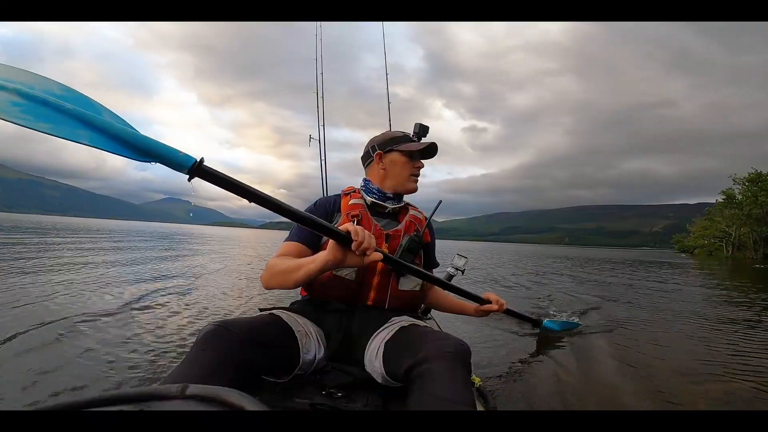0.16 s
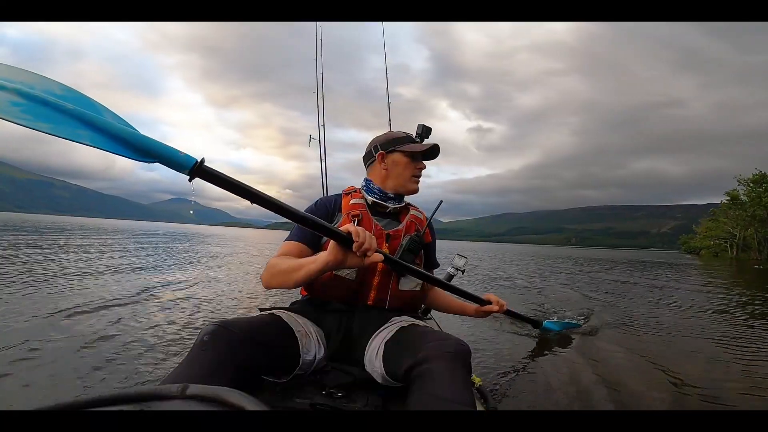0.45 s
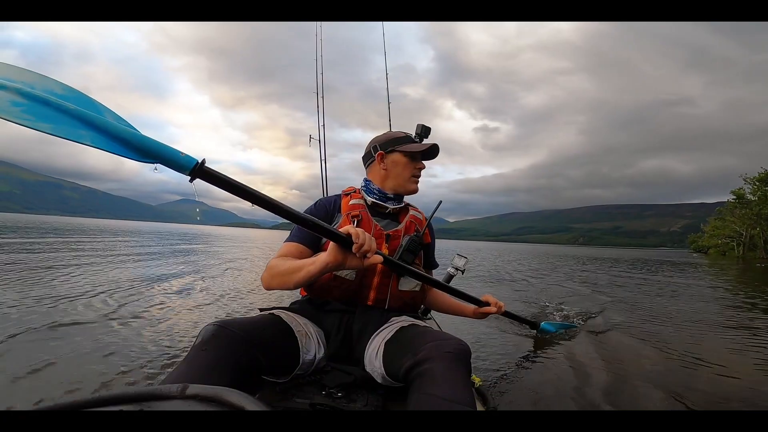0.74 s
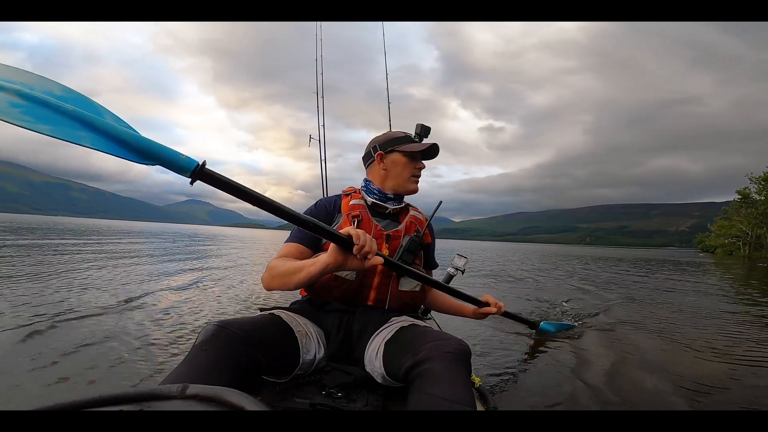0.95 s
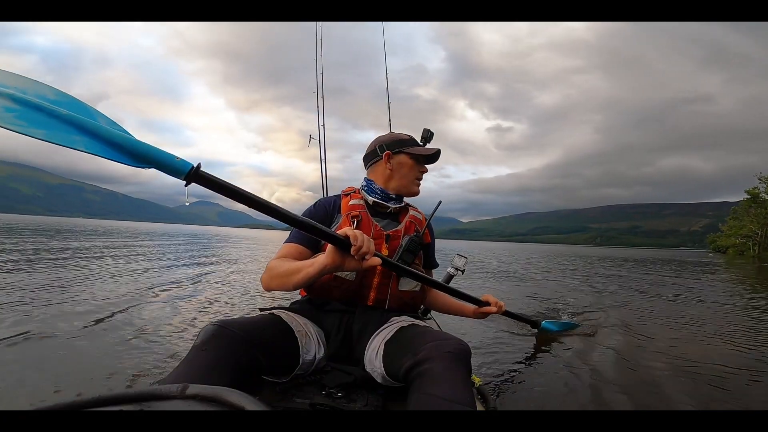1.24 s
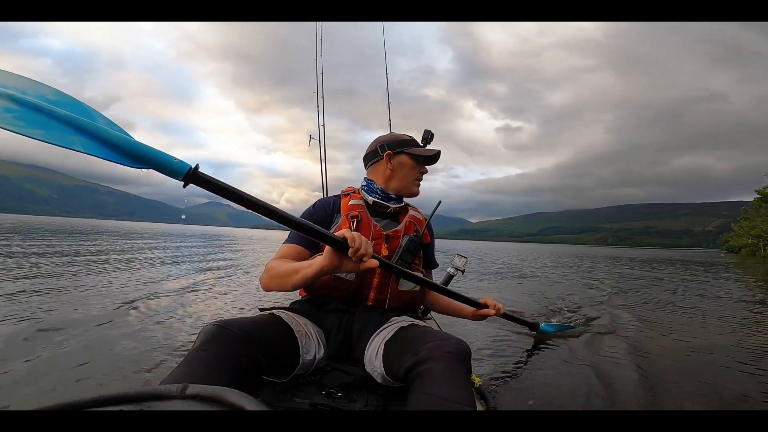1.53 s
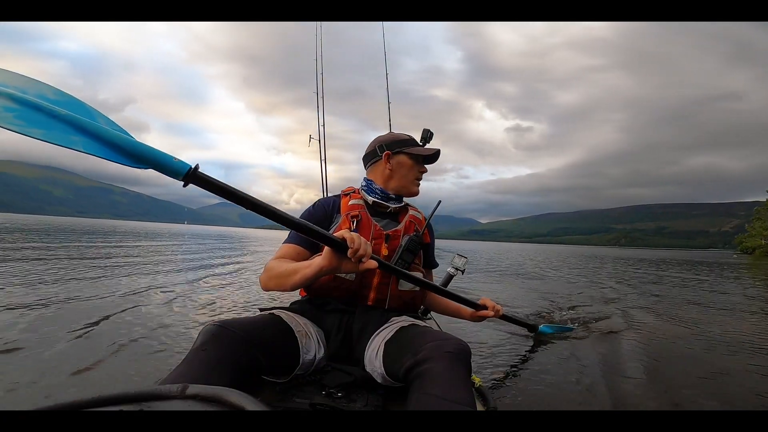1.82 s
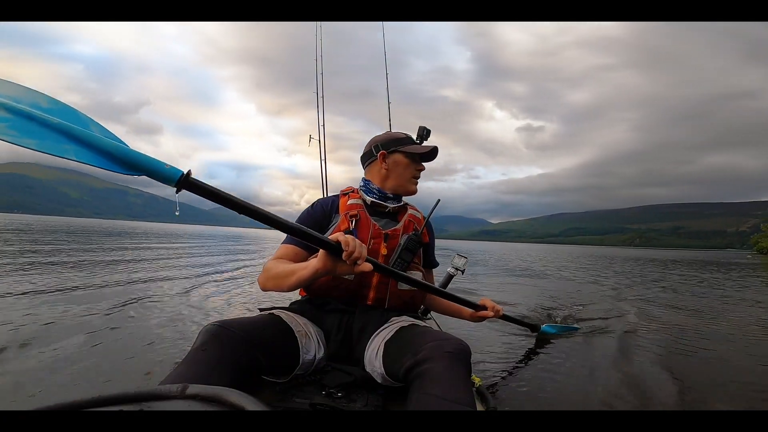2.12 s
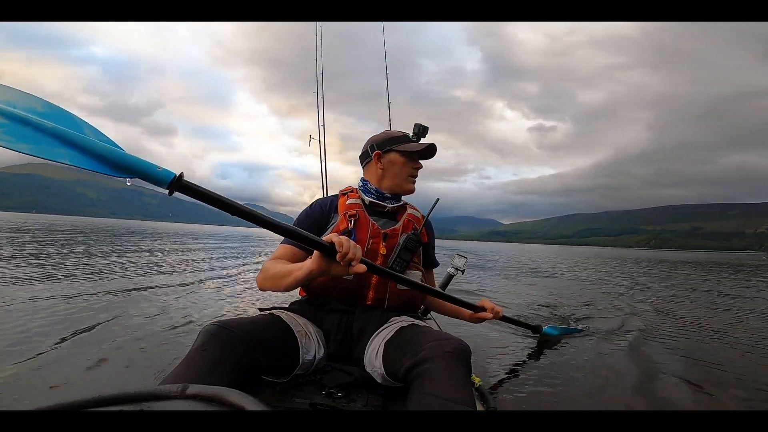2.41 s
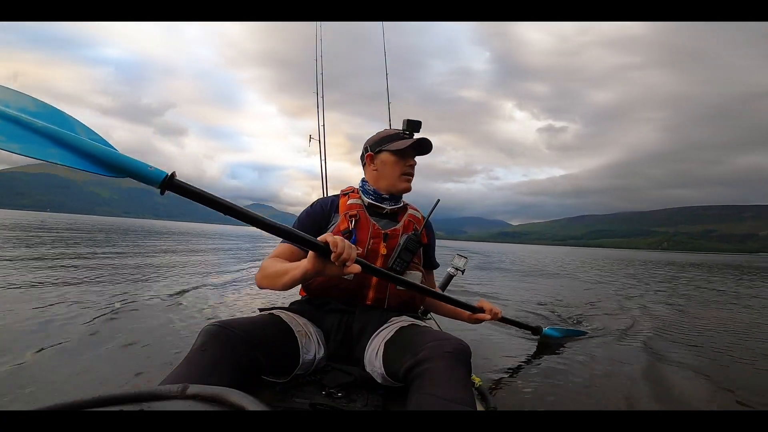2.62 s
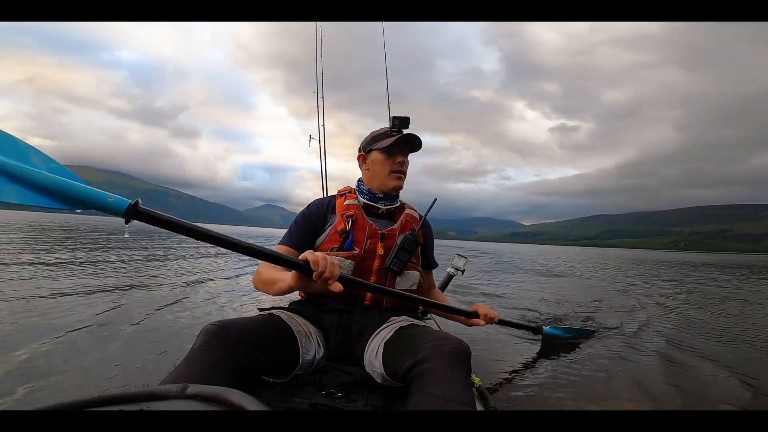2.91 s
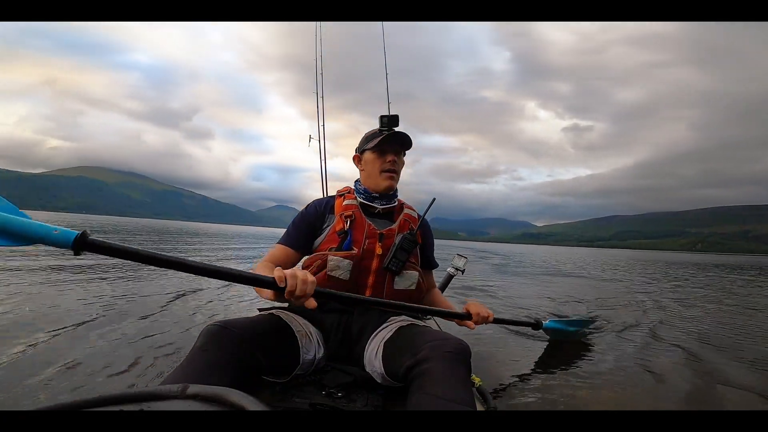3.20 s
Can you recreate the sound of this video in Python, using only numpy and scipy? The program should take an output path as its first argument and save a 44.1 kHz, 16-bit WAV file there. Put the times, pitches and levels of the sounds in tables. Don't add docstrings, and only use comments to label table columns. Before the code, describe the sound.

Water gurgles and drips around a dragging kayak paddle while light wind rumbles on the microphone

```python
import sys
import numpy as np
from scipy import signal
from scipy.io import wavfile

SR = 44100
rng = np.random.default_rng(int(sys.argv[2]) if len(sys.argv) > 2 else 0)


def bounce(signal):
    frames = np.transpose(np.atleast_2d(signal))
    limited = np.clip(frames, -1, 1)
    pcm = np.round(limited * 32767).astype(np.int16)
    wavfile.write(sys.argv[1], SR, pcm)


def volts_from_decibels(level):
    exponent = np.asarray(level, float) / 20
    return 10 ** exponent


N = 147735

# (time [s], level [dB])
CHURN_DB = [(0, -53.5), (.09, -55), (.2, -53.5), (.36, -52), (.56, -59.5), (.71, -50.5), (.93, -54.5),
            (1.03, -56), (1.14, -56.5), (1.3, -57), (1.47, -61.5), (1.57, -54), (1.75, -54), (1.98, -59.5),
            (2.38, -68.5), (2.62, -65.5), (2.74, -77), (3.35, -69)]
# (frequency [Hz], density [dB per Hz])
WASH_COLOUR = [(350, 7), (1000, -0.5), (1400, -0.5), (2500, -15.5), (4300, -16), (6300, -34.5),
               (10500, -62), (13000, -56)]
HALF_OCTAVES_HZ = 300 * 2 ** np.arange(0, 5.6, .5)


def rms_one(x):
    return x / np.sqrt(np.mean(x ** 2) + 1e-20)


def in_time(rows):
    return np.interp(np.arange(N) / SR, *np.transpose(rows))


def at_hz(points, hz):
    table_hz, table_db = np.transpose(points)
    return np.interp(np.log(hz), np.log(table_hz), table_db)


def drift(rate_hz):
    hop = 40
    pole = np.exp(-2 * np.pi * rate_hz * hop / SR)
    white = rng.standard_normal(N // hop + 2002)
    slow = signal.lfilter([1], [1, -2 * pole, pole * pole], white)[2000:]
    return np.interp(np.arange(N) / hop, np.arange(len(slow)), rms_one(slow))


def banded_noise(colour, edges_hz, shared_db, own_db, rate_hz):
    out, together = 0, drift(rate_hz)
    white = rng.standard_normal((2, N + SR))
    for k, (low_hz, high_hz) in enumerate(zip(edges_hz, edges_hz[1:])):
        sos = signal.butter(2, [low_hz, high_hz], "band", fs=SR, output="sos")
        band = signal.sosfilt(sos, white[k % 2])[SR:]
        level_db = at_hz(colour, np.sqrt(low_hz * high_hz))
        out = out + band * volts_from_decibels(level_db + shared_db * together + own_db * drift(rate_hz))
    return rms_one(out)


def ring(start_s, peak_db, pitch_hz, ring_cycles, rise_per_cycle):
    out = np.zeros(N + SR)
    ring_cycles = np.clip(ring_cycles, 3, 90)
    rows = np.broadcast_arrays(start_s, peak_db, pitch_hz, ring_cycles, rise_per_cycle)
    for s, db, hz, cycles, rise in zip(*rows):
        turn = np.arange(int(cycles / hz * SR)) * hz / SR
        attack_cycles = 1.41 * np.sqrt(hz / 1000)
        swell = 1 - np.exp(-(turn / attack_cycles) ** 2)
        tone = np.sin(2 * np.pi * (turn + rise * turn ** 2 / 2))
        i = int(s * SR)
        out[i:i + len(turn)] += swell * volts_from_decibels(db - 60 * turn / cycles) * tone
    return out[:N]


def cluster(start_s, peak_db, pitch_hz, cycles, rise, spread_s, side_db):
    out = ring(start_s, peak_db, pitch_hz, cycles, rise)
    draw = rng.random((len(start_s), 3, 3))
    for late, weak, tune in draw.transpose(1, 2, 0):
        side_hz = pitch_hz * 2 ** (1.1 * (tune - .3))
        side_peak_db = peak_db + side_db - 13.0 * weak
        out += ring(start_s + spread_s * late, side_peak_db, side_hz, 0.31 * cycles, rise)
    return out


def puffs(start_s, peak_db, t60_s):
    kicks = np.zeros(N)
    kicks[(start_s * SR).astype(int)] = volts_from_decibels(peak_db)
    return signal.lfilter([1], [1, -volts_from_decibels(-60 / (t60_s * SR))], kicks + 1e-18)


def spray(start_s, peak_db):
    edges_hz = 600 * 2 ** np.arange(0, 4.6, .5)
    return puffs(start_s, peak_db, 0.15) * banded_noise(WASH_COLOUR, edges_hz, 1.0, 1.5, 37.0)


def gulps():
    # (time [s], peak [dB], pitch [Hz], ring [cycles])
    pockets = [(0.032, -30, 1210, 16), (0.237, -24, 1034, 31), (0.255, -32.5, 950, 55),
               (0.269, -22.5, 1780, 16.7), (0.293, -24.5, 910, 16), (0.327, -27.5, 1360, 17),
               (0.381, -37.5, 1040, 37), (0.418, -35.5, 1820, 33), (0.705, -22, 1300, 14),
               (0.806, -34.5, 903, 42), (0.932, -36, 975, 110), (1.197, -40, 1140, 25),
               (1.229, -31, 1040, 45), (1.365, -38.5, 860, 100), (1.57, -30.5, 1430, 26),
               (1.628, -28.5, 1520, 21), (1.659, -38.5, 920, 36), (1.827, -20, 1100, 9.3),
               (1.912, -21, 1210, 23), (1.919, -23.5, 1350, 35), (2.295, -44.5, 1016, 71),
               (2.335, -43, 1096, 96), (2.376, -45.5, 992, 76), (2.606, -38, 970, 26),
               (2.608, -39, 1400, 41), (2.98, -40.5, 875, 25), (2.994, -40, 1220, 39)]
    last_pocket = (3.052, -35.5, 1191, 17)
    s, db, hz, cycles = np.transpose(pockets + [last_pocket])
    body = cluster(s, db + 0.5, hz * 0.977, cycles, 0.0053, spread_s=0.0051, side_db=3.0)
    smack = ring(s, db - 8.5, hz * 1.35, 0.54 * cycles, 0)
    dull_spray = signal.lfilter(*signal.butter(2, 2400, fs=SR), spray(s, db - 24))
    return body + smack + dull_spray


def slow_gulp():
    start_s, peak_db, pitch_hz, cycles = 1.968, -42.5, 563, 22.2
    turn = np.clip((np.arange(N) / SR - start_s) * pitch_hz, 0, cycles)
    swell = np.sin(np.pi * turn / cycles) ** 2
    return volts_from_decibels(peak_db) * swell * np.sin(2 * np.pi * (turn + 0.019 * turn ** 2))


def bubbles_and_drops():
    # (time [s], peak [dB], pitch [Hz])
    small_bubbles = [(0.03, -43, 2600), (0.1585, -36, 2200), (0.347, -39.5, 2740), (0.386, -37, 2580),
                     (0.4137, -42, 2900), (0.4852, -38, 2650), (0.5387, -48, 2700), (0.7178, -29, 2560),
                     (0.7782, -28.5, 3590), (0.8436, -34.5, 3460), (0.921, -29.5, 2310),
                     (1.1335, -35, 2240), (1.27, -39, 2340), (1.3005, -37.5, 2350), (1.3275, -41, 3650),
                     (1.5536, -36.5, 2530), (1.732, -32.5, 2160), (1.811, -41.5, 3040),
                     (2.0444, -37.5, 3010), (2.2178, -39, 3850), (2.2544, -44, 2400), (2.377, -34, 2400),
                     (2.4616, -46, 2270), (2.5838, -46.5, 2800), (3.2892, -48.5, 2500)]
    # (time [s], peak [dB], pitch [Hz])
    spray_drops = [(0.195, -40.5, 5600), (0.257, -44.5, 5050), (0.297, -55, 4700), (0.604, -47.5, 4830),
                   (0.6987, -39.5, 4660), (0.8323, -36, 5450), (0.9393, -31.5, 6360), (1.0183, -50, 5900),
                   (1.666, -40.5, 5900), (1.686, -53, 5240), (1.711, -46, 4800), (1.736, -38.5, 5430),
                   (1.7514, -36.5, 4080), (2.043, -60, 4800), (2.6428, -52, 5800), (2.686, -52.5, 4300),
                   (3.052, -51, 4500), (3.1457, -57, 4570), (3.1592, -50, 6000), (3.238, -59, 4300),
                   (3.2943, -59, 5160)]
    s, db, hz = np.transpose(small_bubbles)
    out = cluster(s, db - 1.0, hz, 46.5, 0.00047, spread_s=0.014, side_db=4.5)
    s, db, hz = np.transpose(spray_drops)
    out += cluster(s, db + 6.5, hz, 25.3, 0, spread_s=0.0011, side_db=5.8)
    s, db, hz = np.transpose(small_bubbles + spray_drops)
    return out + signal.lfilter(*signal.butter(1, 3500, "high", fs=SR), spray(s, db - 17))


def ticks():
    # (time [s], peak [dB])
    bursts = [(0.0223, -52), (0.0483, -59), (0.154, -55), (0.194, -47), (0.2374, -65), (0.2967, -54),
              (0.3511, -68), (0.6035, -67), (0.6035, -62), (0.6374, -70), (0.671, -68.5), (0.695, -58),
              (0.7367, -69), (0.8325, -57), (0.8325, -60), (0.8669, -59), (0.9184, -50), (0.9386, -47),
              (0.9662, -54), (1.016, -58), (1.07, -57), (1.1804, -63), (1.197, -61), (1.346, -59),
              (1.5569, -59), (1.6282, -54), (1.6482, -59), (1.665, -51.5), (1.6866, -52.5), (1.714, -54),
              (1.7325, -57), (1.7913, -61), (1.8143, -70), (1.8316, -57.5), (1.875, -59), (2.0403, -56),
              (2.3045, -56), (2.3366, -63), (2.585, -61.5), (2.6472, -55.5), (2.829, -65.5), (2.859, -64),
              (3.144, -59.5), (3.22, -64.5), (3.238, -58.5), (3.2944, -63)]
    swell_s, t60_s = 0.0012, 0.02
    s, db = np.transpose(bursts)
    soft = np.exp(-1 / (swell_s * SR))
    shape = signal.lfilter([1 - soft], [1, -soft], puffs(s, db + 0.5, t60_s))
    sos = signal.butter(3, [2300, 7000], "band", fs=SR, output="sos")
    return shape * rms_one(signal.sosfilt(sos, rng.standard_normal(N)))


def plops():
    # (time [s], peak [dB], pitch [Hz])
    lone_drops = [(0.006, -38, 2330), (0.166, -44, 1000), (0.207, -44.5, 560), (0.462, -40, 1520),
                  (0.485, -39, 1020), (0.53, -41.5, 930), (0.772, -49, 1840), (0.831, -35.5, 1740),
                  (0.994, -39.5, 1505), (1.298, -38.5, 1860), (1.41, -43.5, 496), (1.612, -43, 980),
                  (1.835, -36, 1375), (1.901, -40, 935), (2.103, -47.5, 1990), (2.146, -49, 846),
                  (2.178, -52.5, 2190), (2.192, -47, 774), (2.273, -51, 1990), (2.295, -46, 720),
                  (2.33, -42.5, 780), (2.34, -50, 2300), (2.377, -44, 1500), (2.426, -57, 3880),
                  (2.484, -53, 2270), (2.52, -50, 946), (2.539, -47, 1700), (2.619, -51.5, 3000),
                  (2.854, -57, 2600), (3.268, -53, 887), (3.278, -60, 2820), (3.287, -52.5, 808),
                  (3.317, -53, 2300)]
    s, db, hz = np.transpose(lone_drops)
    return ring(s, db + 0.5, hz, 57.7 * (hz / 1000) ** 0.14, 0.0029 * 1000 / hz)


def slaps():
    # (time [s], peak [dB], pitch [Hz], ring [cycles])
    hull_hits = [
        (0.725, -35, 438, 37),
        (0.881, -22, 104, 9.1),
        (1.115, -38, 393, 31),
        (1.252, -21, 62.6, 4.8),
        (1.57, -29, 140, 12),
        (1.902, -11.5, 196, 7.6),
        (1.974, -32, 390, 28),
    ]
    return ring(*np.transpose(hull_hits), 0.0067)


def wash(churn_db):
    hiss = banded_noise(WASH_COLOUR, HALF_OCTAVES_HZ, 2.4, 2.53, 40.0)
    treble = signal.lfilter(*signal.butter(2, 6500, "high", fs=SR), hiss)
    hiss = hiss + volts_from_decibels(0.23 * churn_db - 2.0) * treble
    return volts_from_decibels(-59 + 0.78 * churn_db) * hiss


def fizz(churn_db):
    # (frequency [Hz], level [dB])
    strength = [(600, -10), (1000, -2), (1500, -4), (3000, -13.5), (6300, -27.5), (12000, -44.5)]
    births_per_s = 2.5 * 1400 * volts_from_decibels(6.0 * drift(20.0) + .4 * churn_db - 4.0)
    born = np.flatnonzero(rng.random(N) < births_per_s / SR)
    pitch, luck, length, bend = rng.random((N, 4))[born].T
    hz = 550 * 22 ** pitch
    db = at_hz(strength, hz) + 15.3 * np.log10(hz / 1000) - 8.7 * np.log(luck + .09)
    cycles = 24 * (.4 + 1.8 * length ** 2) * (hz / 1000) ** 0.36
    crowd = rms_one(ring(born / SR, db, hz, cycles, 0.019 * (bend - .5)))
    return volts_from_decibels(-59 + churn_db) * crowd


def wake():
    churn_db = in_time(CHURN_DB)
    churn_db = churn_db - churn_db.mean()
    return wash(churn_db) + fizz(churn_db)


def lake():
    # (frequency [Hz], density [dB per Hz])
    lapping = [(300, -7.5), (600, 5), (1000, 5.5), (1400, -17), (2000, -33), (4300, -16.5), (9000, -29),
               (13000, -36)]
    return volts_from_decibels(-64) * banded_noise(lapping, HALF_OCTAVES_HZ, 0.67, 0.75, 30.0)


def eddy(air, length_s, top_hz):
    sos = np.vstack([signal.butter(2, top_hz, fs=SR, output="sos"),
                     signal.butter(4, 300, fs=SR, output="sos"),
                     signal.butter(1, 22, "high", fs=SR, output="sos")])
    return signal.sosfilt(sos, air)[SR // 4:]


def wind():
    # (time [s], level [dB])
    breeze = [(0, -47.5), (.9, -36.5), (2.0, -41.5), (2.8, -53.5), (3.35, -50.5)]
    # (frequency [Hz], density [dB per Hz])
    breeze_colour = [(20, 6), (43, 6), (163, -4.5), (240, -15), (430, -36.5), (700, -38.5)]
    # (time [s], length [s], level [dB], top [Hz])
    buffets = [(0.019, 0.04, -42, 230), (0.128, 0.19, -37, 202), (0.297, 0.48, -36.5, 147),
               (0.518, 0.081, -39.5, 130), (0.649, 0.093, -24.5, 114), (0.769, 0.078, -20, 60),
               (0.816, 0.034, -26.5, 178), (0.843, 0.14, -23, 146), (0.939, 0.088, -23.5, 180),
               (1.0, 0.072, -27, 200), (1.053, 0.17, -42, 125), (1.227, 0.096, -27, 84.5),
               (1.414, 0.078, -45.5, 60), (1.517, 0.1, -28.5, 232), (1.682, 0.077, -28.5, 220),
               (1.725, 0.073, -25, 220), (1.78, 0.17, -32.5, 130), (1.935, 0.062, -35.5, 300),
               (2.044, 0.026, -32.5, 91), (2.174, 0.14, -42, 111), (2.324, 0.2, -42.5, 86.4),
               (2.549, 0.059, -39, 81), (2.612, 0.097, -43, 46.6), (3.043, 0.13, -48.5, 59)]
    edges_hz = 18 * 2 ** np.arange(0, 5.6, .5)
    out = volts_from_decibels(in_time(breeze) + 3.0) * banded_noise(breeze_colour, edges_hz, 0.74, 4.9, 6.4)
    white, lumps, t = rng.standard_normal(N + SR), drift(20.0), np.arange(N) / SR
    for s, length_s, db, top_hz in buffets:
        span = slice(int(s * SR), min(N, int((s + length_s) * SR)))
        air = eddy(white[span.start:span.stop + SR // 4], length_s, top_hz)
        ramp = np.interp(t[span], [s, s + 0.27 * length_s, s + length_s], [0, 1, 0])
        gust = rms_one(air * volts_from_decibels(3.5 * lumps[span]))
        out[span] += volts_from_decibels(db + 1.0) * np.sin(np.pi / 2 * ramp) * gust
    port_top = 0.18
    return port_top * np.tanh(out / port_top)


def scene():
    water = gulps() + slow_gulp() + bubbles_and_drops() + ticks() + plops() + slaps()
    return (water + wake() + lake() + wind())[None, :]


def top_cut(x):
    return signal.sosfilt(signal.butter(12, 13200, fs=SR, output="sos"), x)


def record(dry):
    mix = signal.sosfilt(signal.butter(5, 13200, fs=SR, output="sos"), dry)
    return top_cut(mix)


dry = scene()
out = record(dry)
bounce(out)
```